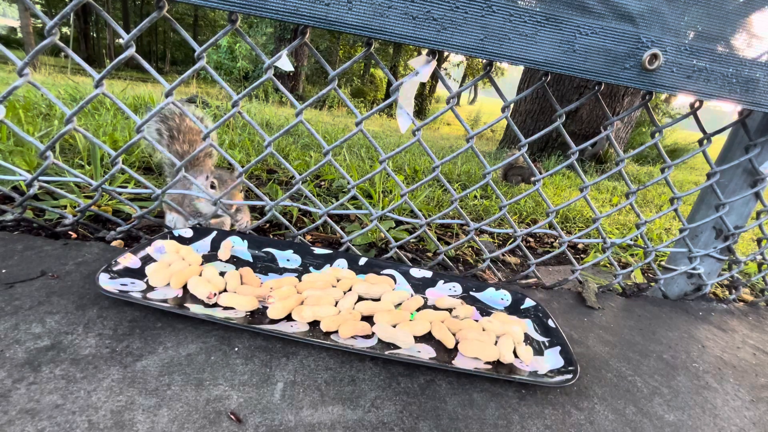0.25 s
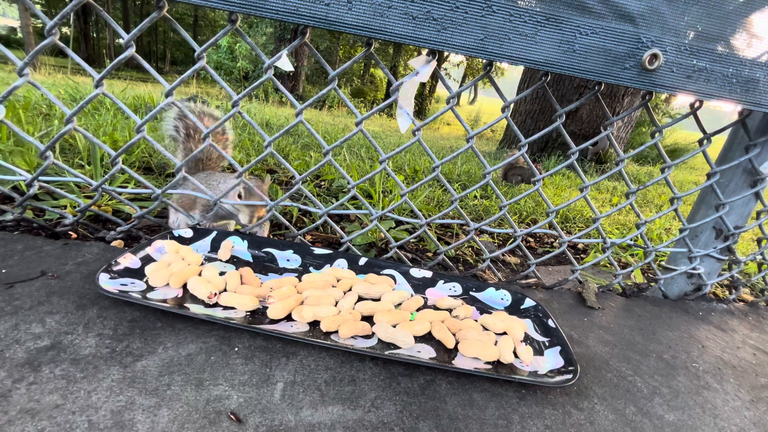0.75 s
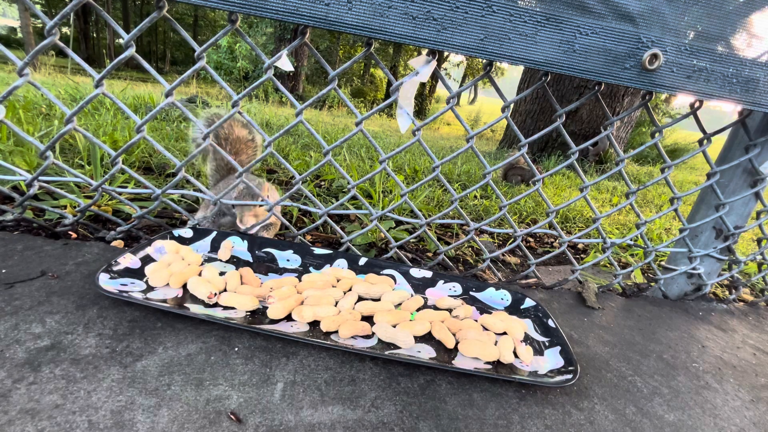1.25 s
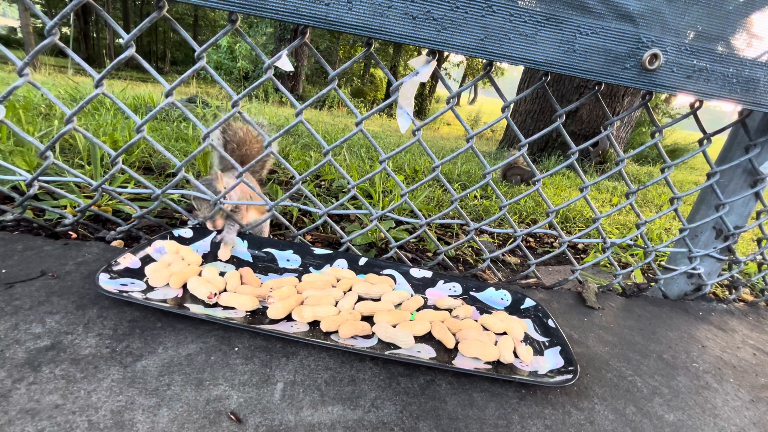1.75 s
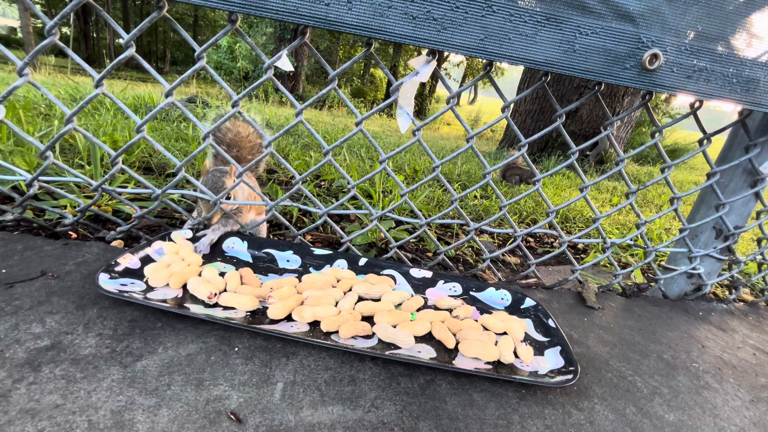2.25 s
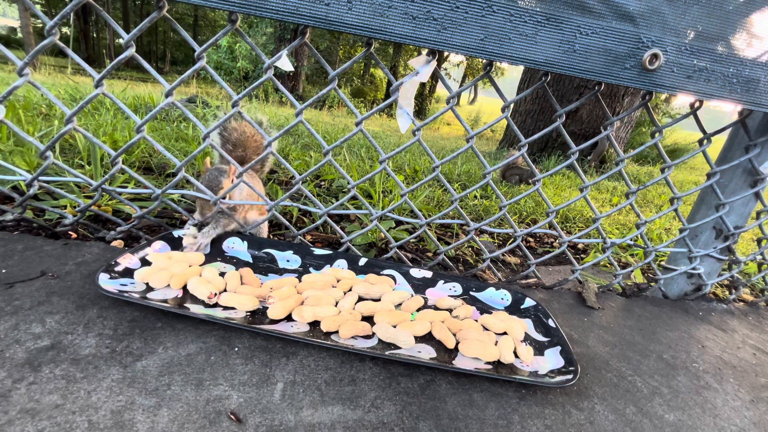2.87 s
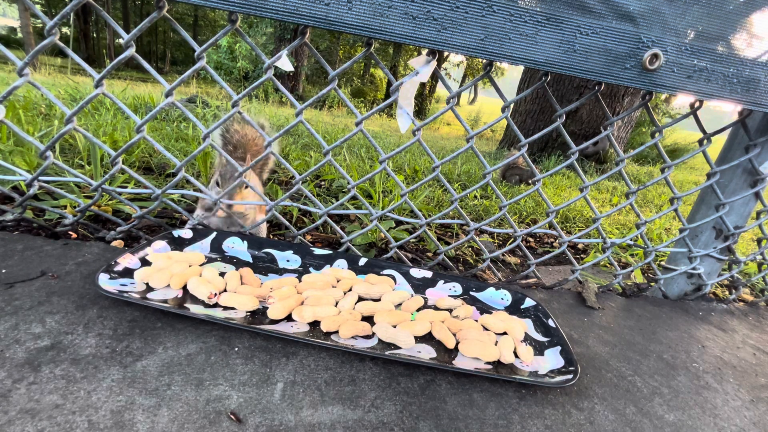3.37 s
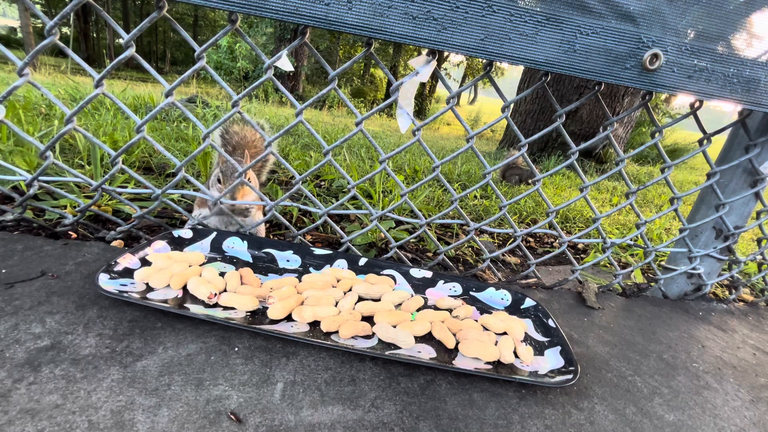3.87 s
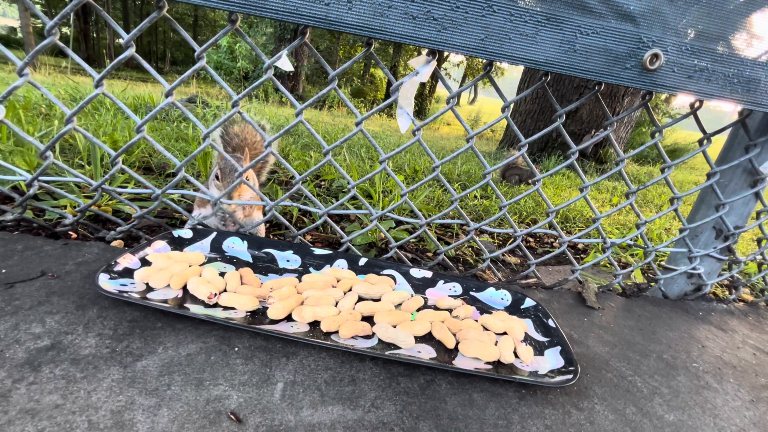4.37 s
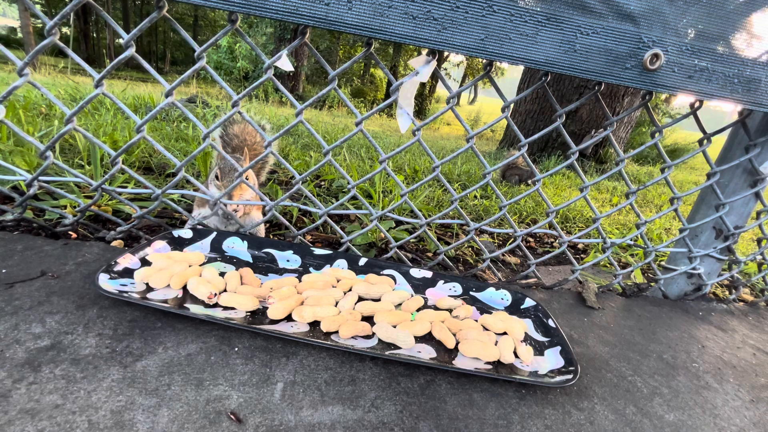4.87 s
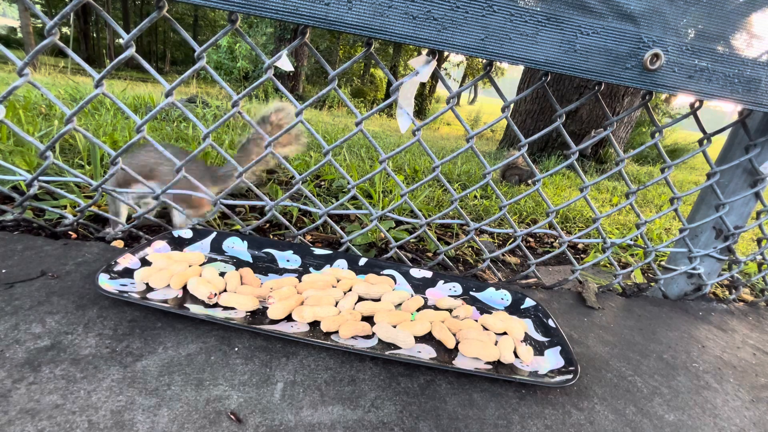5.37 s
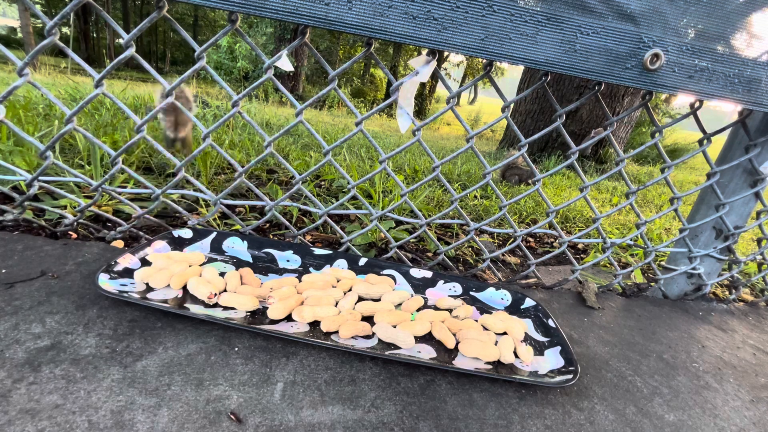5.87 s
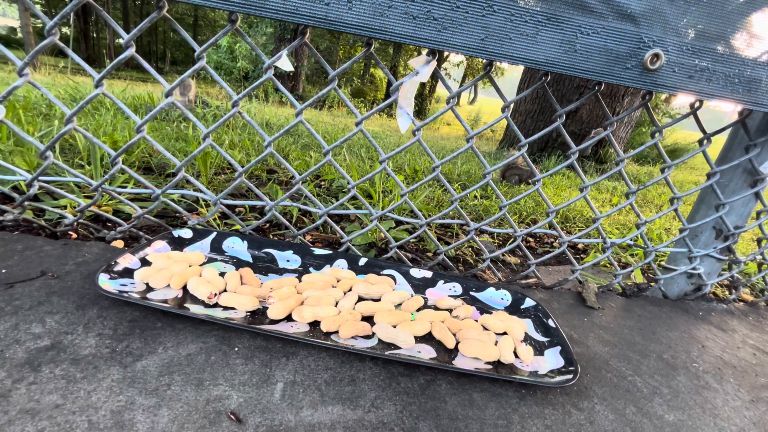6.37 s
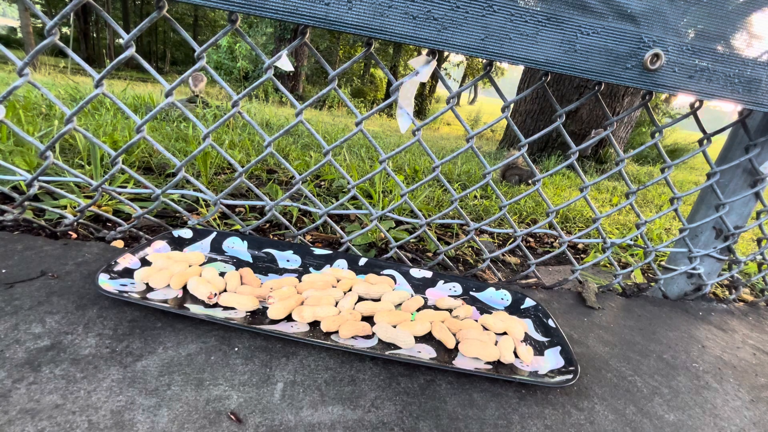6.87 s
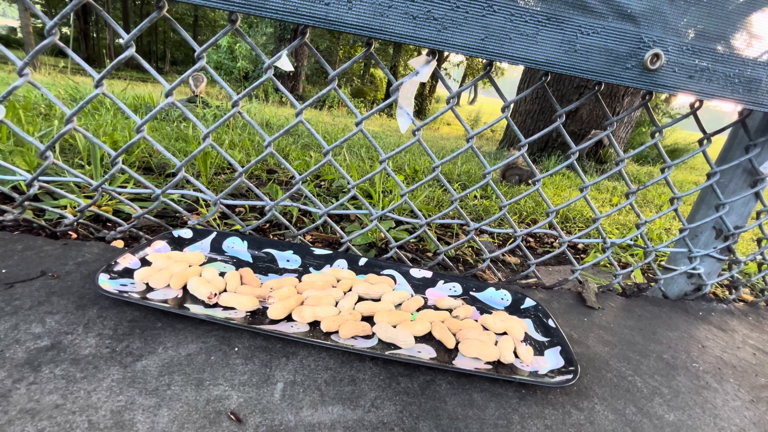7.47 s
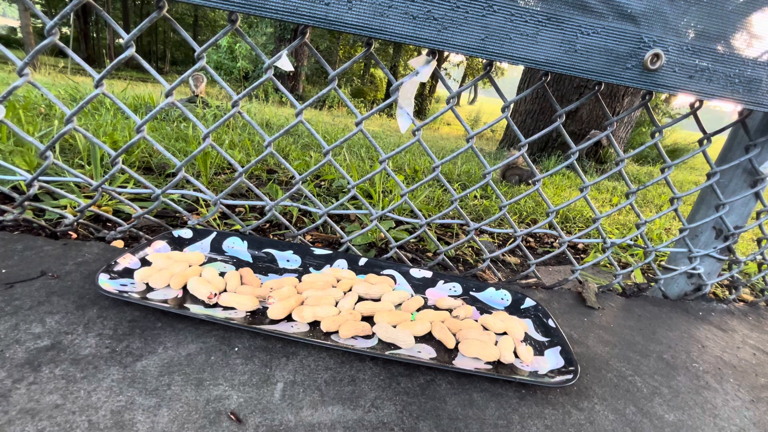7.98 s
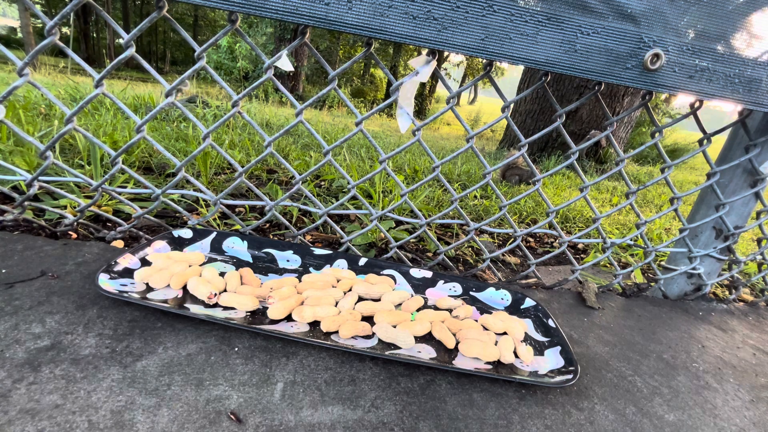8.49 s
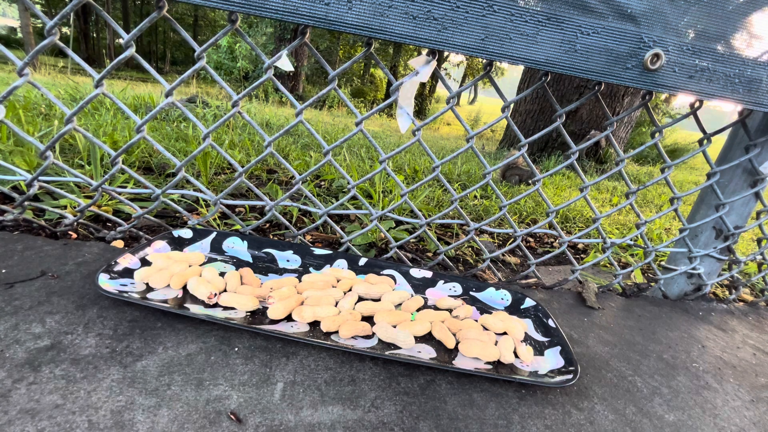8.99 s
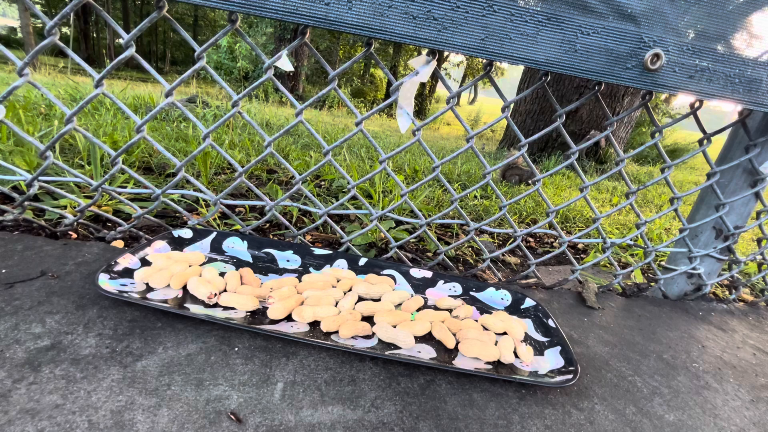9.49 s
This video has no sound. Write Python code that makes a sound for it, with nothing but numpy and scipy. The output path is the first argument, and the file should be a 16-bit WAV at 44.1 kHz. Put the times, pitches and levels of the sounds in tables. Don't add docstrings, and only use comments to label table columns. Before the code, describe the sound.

Outdoor park: sharp clucking chipmunk knocks with quick slapback echoes, close shell cracking and claw ticks early on, faint birds, steady distant traffic.

```python
import sys
import numpy as np
from scipy import signal
from scipy.fft import rfft, irfft, next_fast_len
from scipy.io import wavfile
from scipy.ndimage import uniform_filter1d, map_coordinates

SR = 44100
rng = np.random.default_rng(int(sys.argv[2]) if len(sys.argv) > 2 else 0)


def dump_mix(stems):
    frames = np.atleast_2d(stems).T
    limited = np.clip(frames, -1, 1)
    pcm = np.round(limited * 32767).astype(np.int16)
    wavfile.write(sys.argv[1], SR, pcm)


def decibels_to_gain(level_db):
    exponent = np.asarray(level_db, float) / 20
    return 10 ** exponent


N = 429534
T = np.arange(SR // 10) / SR
PORTS = np.array([[1], [-1]])
PORT_TURN_RAD = 1.45


def unit(x):
    return x / np.sqrt(np.mean(x ** 2) + 1e-20)


def along(points, hz):
    f, v = np.transpose(points)
    return np.interp(np.log(hz + 1), np.log(f + 1), v)


def curves(rows):
    s, *cols = np.transpose(rows)
    return [np.interp(np.arange(N) / SR, s, c) for c in cols]


def wobble(rate_hz):
    knots = rng.standard_normal(int(N * rate_hz / SR) + 4)
    return map_coordinates(knots, [np.arange(N) * rate_hz / SR])


def filtered(x, response):
    n = x.shape[-1]
    m = next_fast_len(n + 4096)
    return irfft(rfft(x, m) * response(np.fft.rfftfreq(m, 1 / SR)), m)[..., :n]


def resonant(modes):
    def response(f):
        total = 0
        for k, (hz, width_hz, db) in enumerate(modes):
            damping = 1j * f * width_hz
            total = total + (-1) ** k * decibels_to_gain(db) * damping / (hz * hz - f * f + damping)
        return total
    return response


def ring(hz, t60_s, attack_s):
    return np.sin(2 * np.pi * hz * T) * decibels_to_gain(-60 * T / t60_s) * (1 - np.exp(-T / attack_s))


def add(out, s, sound, pan_db, lag_s=0.):
    out[0, round(s * SR) + round(lag_s * SR):][:len(sound)] += decibels_to_gain(pan_db / 2) * sound
    out[1, round(s * SR):][:len(sound)] += decibels_to_gain(-pan_db / 2) * sound


# pitch_hz, t60_s
PARK_DECAY = [(250, 0.31), (1000, 0.75), (4000, 0.66), (12000, 0.65)]


def park(x, wet_db):
    hz, t, z = signal.stft(rng.standard_normal((2, SR // 2)), SR, nperseg=256)
    decay = decibels_to_gain(-60 * t / along(PARK_DECAY, hz)[:, None])
    tail = signal.istft(z * decay, SR, nperseg=256)[1]
    late = np.pad(x, ((0, 0), (90, 0)))
    return decibels_to_gain(wet_db) * signal.fftconvolve(late, tail / 50, axes=1)


# pitch_hz, pan_db
CLICK_PAN = [(1400, 11), (2200, 11), (3800, 5.5), (5200, 17), (7500, 8.5), (9500, -2), (13000, -4.5)]
TWIN_S = .00033
CLICK_TOP_HZ, CLICK_EDGE_HZ = 11500, 12000


def knock_click(db, snap_hz, snap, twin, edge, rise_s, t60_s):
    scratch = decibels_to_gain(-60 * T / t60_s) * (1 - np.exp(-T / rise_s)) * rng.standard_normal(len(T))
    scratch[0] = edge
    twin_s = TWIN_S * decibels_to_gain(rng.normal(0, 1))
    mouth = resonant([*snap[:1], *[(hz, .3 * hz, 4) for hz in snap_hz], *snap[1:]])

    def response(f):
        doubled = 1 + twin * np.exp(-2j * np.pi * f * twin_s)
        return mouth(f) * doubled / (1 + 1j * f / CLICK_TOP_HZ) ** 2 / (1 + (f / CLICK_EDGE_HZ) ** 6)

    burst = filtered(scratch, response)
    click = np.zeros((2, SR // 4))
    add(click, .001, decibels_to_gain(db) * burst / np.abs(burst).max(), 0)
    return click


# pitch_hz, level_db, t60_s
PARTIALS = [(678, -20, 0.059), (1171, -13, 0.073), (1418, -12.5, 0.022), (1526, -13.5, 0.033),
            (2327, -23, 0.046)]
# pitch_hz, pan_db
BODY_PAN = [(300, 2), (700, -7.5), (1000, -3.5), (1500, 0.5)]
RING_ATTACK_S, RING_T60_S, RING_SCATTER_DB = .0003, .028, 2.5
LEAD_RATIO, LEAD_T60_S = 1.244, 0.0082
THUMP_S = .006


def knock_body(hz, ring_db, thump_db, lead_db, partials_db, rough, bounce_s, swell_s, bounce_db, pan_db):
    body = np.zeros((2, SR // 4))
    lag_s = 7 / SR
    rasp = 1 + rough * unit(uniform_filter1d(rng.standard_normal(len(T)), size=70))
    hollow = ring(hz * 1.087, RING_T60_S, RING_ATTACK_S)
    hollow = hollow + decibels_to_gain(lead_db) * ring(hz * LEAD_RATIO, LEAD_T60_S, RING_ATTACK_S)
    for partial_hz, level_db, t60_s in PARTIALS:
        gain = decibels_to_gain(partials_db + level_db + rng.normal(0, RING_SCATTER_DB))
        hollow = hollow + gain * ring(partial_hz, t60_s, RING_ATTACK_S)
    add(body, .0012, decibels_to_gain(ring_db) * rasp * hollow, pan_db, lag_s)
    swell = (T / swell_s * np.exp(1 - T / swell_s)) ** 1.34
    bounce = rasp * swell * np.sin(2 * np.pi * hz * T)
    add(body, bounce_s, decibels_to_gain(ring_db + bounce_db) * bounce, pan_db, lag_s)
    add(body, THUMP_S, decibels_to_gain(thump_db) * ring(245, 0.018, 0.0016), 1.5, lag_s)
    return filtered(body, lambda f: decibels_to_gain(along(BODY_PAN, f) / 2 * PORTS))


PARK_TOP_HZ = 4000
RUFFLE_DB = 2.5


def knocks(rows, echoes, snap, twin, edge, click_rise_s, lead_db, partials_db, click_t60_s, click_db, rough,
          bounce_s, swell_s, bounce_db, ring_db, ring_pan_db, thump_db, wet_db, bright_db):
    out = np.zeros((2, N + 2 * SR))
    for (s, db, hollow_db, hz, *snap_hz), walls in zip(rows, echoes):
        click = knock_click(db + click_db, snap_hz, snap, twin, edge, click_rise_s, click_t60_s)
        dull = filtered(click, lambda f: 1 / (1 + 1j * f / PARK_TOP_HZ) ** 2)
        turn = np.exp(-.5j * PORT_TURN_RAD * PORTS)
        click = filtered(click, lambda f: decibels_to_gain(along(CLICK_PAN, f) / 2 * PORTS) * turn)
        body = knock_body(hz, hollow_db + ring_db, hollow_db + thump_db, lead_db, partials_db, rough,
                         bounce_s, swell_s, bounce_db, ring_pan_db)
        start = round((s - .001) * SR)
        wet = park(decibels_to_gain(bright_db) * dull + body, wet_db)
        wet = wet * decibels_to_gain(RUFFLE_DB * unit(uniform_filter1d(rng.standard_normal(wet.shape), size=300)))
        out[:, start:start + wet.shape[1]] += wet
        out[:, start:start + SR // 4] += click + body
        far_click = filtered(click, lambda f: 1 / (1 + 1j * f / 7000) ** 2)
        for delay_s, snap_db, echo_db in walls:
            echo = decibels_to_gain(snap_db) * far_click + decibels_to_gain(echo_db + rng.normal(0, 0.72)) * body
            out[:, start + round(delay_s * SR):][:, :SR // 4] += echo
    return out[:, :N]


# start_s, click_db, ring_db, ring_hz, click_body_hz
CLUCKS = [(0.9225, -24.5, -26.5, 892, 2220), (2.6276, -20, -24, 907, 2580), (4.3976, -21.5, -26, 890, 2280),
          (6.259, -21.5, -24, 888, 2260), (8.083, -22.5, -25.5, 886, 3100)]
# start_s, click_db, ring_db, ring_hz
SLAPS = [(.9445, -17.5, -22.5, 993), (.957, -21.5, -30, 906), (2.6474, -15, -20, 928),
         (2.6621, -19, -23.5, 916), (4.4183, -17.5, -23.5, 970), (4.4318, -20.5, -31.5, 950),
         (6.2808, -17, -19.5, 983), (6.2933, -20.5, -28, 888), (8.0997, -16, -24, 1018),
         (8.1185, -28, -31, 940)]
# start_s, click_db, ring_db, ring_hz
CHUCKS = [
    (1.634, -26.5, -22, 1013),
    (3.2332, -28.5, -25, 1006),
    (4.9836, -26.5, -26, 1030),
    (6.9077, -28, -25.5, 1026),
    (8.4625, -33, -31.5, 1020),
    (8.4806, -42, -36, 1067),
]
# start_s, click_db, ring_db, ring_hz, click_body_hz
SCUFFS = [(0.2186, -32, -38, 968, 4900), (1.9757, -31, -30.5, 954, 4150), (3.6646, -32.5, -34.5, 900, 6250),
          (5.5837, -31.5, -31, 1065, 1680), (7.3037, -38.5, -45, 975, 2470),
          (9.2437, -34.5, -34, 960, 3700)]
# pitch_hz, width_hz, level_db
CLUCK_SNAP = [(1450, 660, -8), (5500, 840, -2), (8640, 3000, -5)]
SLAP_SNAP = [(1460, 260, -9), (3000, 3300, -11), (5560, 4700, 3), (10600, 1500, 0.5)]
CHUCK_SNAP = [(1490, 160, 6.5), (2160, 710, 1.5), (3300, 4500, 1), (4750, 1670, 2.5), (7300, 1600, -5),
              (10100, 4700, -9.5)]
SCUFF_SNAP = [(1250, 270, 7.5), (4900, 990, -9), (5970, 6100, -1), (10200, 2500, -16)]
# delay_s, click_db, ring_db
SLAP_WALL = [(.040, -20, -14.5)]
# delay_s, delay_s, delay_s
NEAR_WALLS_S = [(.040, 0.042, .0745), (0.035, 0.051, .072), (0.0383, 0.0483, .0745), (0.0397, .050, .074),
                (.0435, .050, .079), (.0435, 0.047, .065)]
# click_db, ring_db
NEAR_WALLS_DB = [(-12, -17.5), (-10, -20), (-19, -16.5)]
# delay_s, click_db, ring_db
FLUTTER = [(.116, -36, -29), (.156, -23, -27.5), (.198, -28, -32)]
# delay_s, click_db, ring_db
FAR_WALL = [(0.04, -20, -6), (0.072, -25, -9), (0.047, -18, -13), (.044, -17, -9.5), (.043, -22, -4),
            (0.055, -16, -10)]
# delay_s, click_db, ring_db
SCUFF_AFTER = [
    (.0065, -7.5, -15.5),
    (0.081, -24, -28),
]


def knocking():
    clucks = knocks(
        CLUCKS, [[]] * len(CLUCKS), CLUCK_SNAP, twin=0.4, edge=12, click_rise_s=.0003, lead_db=-10.0,
        partials_db=8.5, click_t60_s=0.014, click_db=2.5, rough=0.16, bounce_s=0.00566, swell_s=0.0044,
        bounce_db=5, ring_db=-9.0, ring_pan_db=2.0, thump_db=13.5, wet_db=-4, bright_db=-1.5)
    slaps = knocks(
        SLAPS, [SLAP_WALL] * len(SLAPS), SLAP_SNAP, twin=0.23, edge=14, click_rise_s=.0003, lead_db=1.5,
        partials_db=0.0, click_t60_s=0.013, click_db=-4.5, rough=0.12, bounce_s=0.0052, swell_s=0.0026,
        bounce_db=7.0, ring_db=-3.0, ring_pan_db=3.0, thump_db=7.5, wet_db=-10, bright_db=13)
    chuck_walls = []
    for delays_s in NEAR_WALLS_S:
        near = [(delay_s, *levels) for delay_s, levels in zip(delays_s, NEAR_WALLS_DB)]
        chuck_walls.append([*near, *FLUTTER])
    chucks = knocks(
        CHUCKS, chuck_walls, CHUCK_SNAP, twin=0.66, edge=23, click_rise_s=0.00021, lead_db=-25,
        partials_db=0.5, click_t60_s=0.022, click_db=3.5, rough=0.26, bounce_s=0.003975, swell_s=0.0035,
        bounce_db=-0.5, ring_db=6.5, ring_pan_db=1.4, thump_db=12.0, wet_db=-17.5, bright_db=17.5)
    scuff_walls = [[wall, *SCUFF_AFTER] for wall in FAR_WALL]
    scuffs = knocks(
        SCUFFS, scuff_walls, SCUFF_SNAP, twin=0.16, edge=0.93, click_rise_s=0.0019, lead_db=-6.5,
        partials_db=-8.0, click_t60_s=0.017, click_db=1.0, rough=0.88, bounce_s=0.0055, swell_s=0.0041,
        bounce_db=-11.5, ring_db=3.5, ring_pan_db=4.5, thump_db=14.0, wet_db=-6.5, bright_db=3.0)
    return clucks + slaps + chucks + scuffs


CRACK_PAN_DB, SPLINTER_T60_S = 4.5, .028


def crack(out, s, db, treble_db, hz, t60_s, rise_s):
    grit = decibels_to_gain(0.62 * rng.standard_normal(len(T))) * rng.standard_normal(len(T))
    decay = decibels_to_gain(-60 * (T / np.clip(t60_s, .008, .1)) ** 0.95) + decibels_to_gain(-36 - 60 * T / 0.14)
    burst = grit * decay * (1 - np.exp(-T / rise_s))
    shell = resonant([(hz, 0.33 * hz, 6.5), (4300, 2000, -1.5), (6500, 3000, -1.5)])
    shards = resonant([(9500, 3000, -1.2), (12800, 3500, 0.8)])
    body = filtered(burst, lambda f: shell(f) * (1j * f / (1500 + 1j * f)) ** 2 / (1 + (f / 9500) ** 4))
    splinter = filtered(burst * decibels_to_gain(-60 * T / SPLINTER_T60_S),
                        lambda f: shards(f) / (1 + (5600 / (f + 1)) ** 6))
    add(out, s - .001, decibels_to_gain(db + 6.0) * body / np.abs(body).max(), CRACK_PAN_DB, lag_s=2 / SR)
    ports = filtered(splinter, lambda f: np.exp(-.5j * PORT_TURN_RAD * PORTS) + 0 * f)
    start = round((s - .001) * SR)
    out[:, start:][:, :len(T)] += decibels_to_gain(treble_db + 12.0) * ports / np.abs(splinter).max()


# start_s, hold_s, level_db
BRUSHES = [(0, 0.066, -65), (0.137, 0.053, -63.5), (0.387, 0.16, -68.5), (0.708, 0.13, -73.5),
           (0.996, 0.085, -68), (1.136, 0.013, -71), (1.232, 0.029, -59.5), (1.284, 0.024, -68),
           (1.9, 0.27, -75), (2.125, 0.077, -60), (2.68, 0.12, -76), (2.884, 0.052, -62),
           (2.973, 0.018, -57), (3.07, 0.028, -73), (3.287, 0.092, -73), (3.707, 0.28, -74),
           (4.066, 0.3, -83), (4.794, 0.046, -62), (5.04, 0.074, -72), (4.6, .08, -74), (5.396, 0.17, -80),
           (5.77, 0.14, -76), (6.15, 0.029, -72), (6.346, 0.14, -74), (7.024, 0.18, -80),
           (7.656, 0.08, -97), (8.29, 0.033, -64.5), (9.297, 0.18, -85)]
BRUSH_ATTACK_S, BRUSH_RELEASE_S, STILL_DB = 0.0093, 0.026, -95


def brushing():
    t = np.arange(0, N / SR, .002)
    gain = decibels_to_gain(STILL_DB)
    for s, hold_s, db in BRUSHES:
        before_s = np.clip(s - t, 0, None)
        after_s = np.clip(t - s - hold_s, 0, None)
        gain = gain + decibels_to_gain(db) * np.exp(-before_s / BRUSH_ATTACK_S - after_s / BRUSH_RELEASE_S)
    return np.interp(np.arange(N) / SR, t, gain)


# pitch_hz, level_db_per_hz
LEAVES = [(1470, -55), (2500, -18.5), (3830, -3.5), (5740, -6), (9000, -6.5), (12800, -3.5), (14500, -7.5),
          (15600, -25)]
# pitch_hz, ratio
APART = [(9000, 2), (11500, .35), (13000, .35), (14500, 2)]
GUSTY_DB, GRITTY_DB, GRAINY_DB = 3, 2, 4


def rustle():
    swing_db = GUSTY_DB * wobble(25) + GRITTY_DB * wobble(150) + GRAINY_DB * wobble(720)
    grains = decibels_to_gain(swing_db) * rng.standard_normal((3, N))
    share = lambda hz: np.array([hz ** 0, *[along(APART, hz)] * 2])
    shared, *private = filtered(grains, lambda hz: decibels_to_gain(along(LEAVES, hz)) * share(hz))
    return brushing() * unit(shared + np.array(private))


# start_s, peak_db, treble_peak_db, ring_hz
CRACKS = [(0.014, -49.5, -58, 1940), (0.057, -50.5, -67, 1830), (.15, -60, -55, 1750),
          (0.254, -51.5, -56.5, 1750), (0.294, -62, -66, 2200), (.42, -46, -49, 4160),
          (.5227, -53.5, -59, 2960), (0.7162, -41, -46, 5170), (0.7202, -36, -53, 3770),
          (1.8269, -32, -36.5, 4430), (1.8356, -36, -68, 2770), (1.9567, -50, -68, 3700),
          (2.039, -62, -67, 1790), (2.141, -48, -55, 3900), (2.17, -35, -44, 4360), (2.193, -53, -58, 4650),
          (2.224, -49, -54, 4060), (2.345, -37, -49, 4150), (2.3762, -48, -53, 3070),
          (2.679, -32.5, -36.5, 4470), (2.875, -46, -51, 4360), (2.879, -55, -58, 3900),
          (2.9762, -48, -52, 1700), (3.043, -39, -42, 4050), (3.257, -48, -44, 4470),
          (3.3282, -51, -59, 1790), (4.792, -64, -63, 3000), (0.267, -59, -78, 1500),
          (2.049, -66, -65, 1700), (4.408, -48, -66, 5200), (2.671, -45, -66, 4500),
          (8.4877, -54, -72, 3480), (5.091, -58, -71, 4300), (4.882, -52.5, -46.5, 3540)]
CRACK_T60_S, CRACK_RISE_S = 0.072, 0.00034
# start_s, peak_db, treble_peak_db, ring_hz
SCRAPES = [(.284, -54, -72, 1800), (2.035, -58, -76, 1700), (1.232, -75, -61, 4470),
           (2.1166, -61, -59, 3310), (2.933, -54, -73, 4740), (4.779, -44.5, -51, 5500),
           (4.788, -51, -49.5, 1750), (4.808, -48, -59, 1590), (4.8217, -62, -70, 1700),
           (8.291, -57, -82, 1700)]
SCRAPE_T60_S, SCRAPE_RISE_S = 0.12, 0.0092
# start_s, peak_db
TICKS = [(0.04, -53), (0.0852, -48), (.0905, -48), (.1005, -46), (0.106, -42), (.1415, -58), (0.389, -51),
         (.3955, -53), (.513, -59), (1.287, -44), (1.304, -48), (0.646, -49.5), (0.669, -49), (1.0708, -51),
         (1.1343, -55), (1.185, -53), (2.1156, -56), (2.5633, -59), (3.493, -55.5), (3.9814, -67),
         (4.173, -56), (4.1854, -51), (4.309, -49), (4.728, -57), (4.7515, -57), (4.761, -40), (3.622, -64),
         (.901, -67), (5.2598, -64), (5.2974, -55), (5.6271, -61), (5.767, -57), (5.8533, -51),
         (7.7255, -56), (7.842, -59), (7.865, -59.5), (8.682, -49), (9.439, -62),
         (.0675, -53), (.1915, -54), (.203, -54), (.5365, -54), (.6407, -63), (.697, -61),
               (.8255, -59), (.8345, -58), (1.265, -45), (1.9473, -56), (2.034, -55), (2.349, -37),
               (3.0864, -52), (3.373, -59), (3.783, -63), (4.096, -59), (4.2288, -60), (4.512, -60),
               (4.6236, -61), (4.6374, -59), (5.11, -57), (5.3703, -62), (5.4974, -60), (5.732, -63),
               (5.7814, -54), (6.2148, -63), (7.0374, -59)]
TICK_T60_S, TICK_HZ, TICK_BODY_DB, TICK_TREBLE_DB = 0.012, 1900, -13.5, -10
# start_s, level_db, ring_hz
PINGS = [(.255, -48, 1000), (.2862, -44, 1950), (.297, -50, 1500), (.7216, -34.5, 1930),
         (1.835, -25.5, 2010), (2.04, -40, 1760), (2.05, -54, 1900)]
PING_T60_S, PING_RISE_S = .035, .0015


def squirrel():
    out = np.zeros((2, N + SR))
    for row in CRACKS:
        crack(out, *row, CRACK_T60_S, CRACK_RISE_S)
    for row in SCRAPES:
        crack(out, *row, SCRAPE_T60_S, SCRAPE_RISE_S)
    for s, db in TICKS:
        crack(out, s, db + TICK_BODY_DB, db + TICK_TREBLE_DB, TICK_HZ, TICK_T60_S, CRACK_RISE_S)
    for s, db, hz in PINGS:
        add(out, s - .001, decibels_to_gain(db) * ring(hz, PING_T60_S, PING_RISE_S), CRACK_PAN_DB)
    return out[:, :N] + park(out, wet_db=-17.0)[:, :N] + rustle()


# start_s, first_hz, level_db, notes
BIRDS = [(.49, 3770, -68, 1), (.515, 3550, -75, 3), (.815, 4670, -75, 1), (1.05, 3300, -72, 1),
         (1.28, 4660, -74, 1), (1.304, 4700, -72.5, 2), (1.48, 3730, -74, 2), (1.894, 3640, -65, 2),
         (2.37, 3700, -57, 1), (2.483, 3520, -70, 3), (3.17, 3350, -65, 1), (3.18, 4200, -69, 1),
         (3.75, 3590, -69.5, 2), (4.03, 3930, -74, 1), (5.12, 3300, -68, 1), (5.89, 3770, -72, 1),
         (5.42, 4470, -69.5, 1), (6.045, 4360, -71, 1), (6.07, 3640, -69.5, 3), (6.68, 3760, -77, 2),
         (7.432, 4740, -70, 2), (7.462, 3510, -65, 2), (7.689, 4400, -73, 1), (7.837, 3300, -70.5, 1),
         (8.999, 4200, -77, 1), (9.33, 4600, -72, 1), (9.72, 3200, -74, 1), (3.91, 4520, -73, 1),
         (3.725, 5170, -69, 1)]
NOTE_S, NOTE_GAP_S, NOTE_FALL, NEXT_NOTE, NEXT_DB = .027, .018, .91, .88, -.5
# start_s, pitch_hz, length_s, level_db
HELD = [(5.31, 3020, .24, -79), (6.03, 4740, .17, -81), (7.08, 3200, .1, -80), (2.37, 2900, .08, -74),
        (.77, 4000, .05, -75), (7.5, 3350, .15, -79), (7.5, 4330, .15, -85), (2.293, 4700, .022, -68),
        (2.312, 4000, .025, -71), (2.325, 3600, .025, -68), (.54, 3500, .07, -76), (5.24, 4950, .035, -72),
        (5.263, 4150, .035, -69), (5.28, 3480, .035, -70), (.795, 3080, .03, -74), (.855, 2900, .05, -70),
        (.665, 4850, .03, -74)]
CHORUS_DB, BIRD_WET_DB, BIRD_SPREAD_DB = -87, -1.5, 3
STEADY, BLURRED, BLUR_RATE_HZ = .5, .8, 450


def birds():
    out = np.zeros((2, N + SR))
    notes = []  # start_s, start_hz, end_hz, length_s, level_db
    for s, first_hz, db, count in BIRDS:
        for k in range(round(count)):
            hz = first_hz * NEXT_NOTE ** k
            notes.append((s + k * NOTE_GAP_S, hz, hz * NOTE_FALL, NOTE_S, db + k * NEXT_DB))
    for when, pitch, fall, size in rng.random((220, 4)):
        start_hz, end_hz = 2900 + 1900 * pitch, 2800 + 1900 * pitch - 500 * fall
        notes.append((when * N / SR, start_hz, end_hz, 0.018 + 0.05 * size, CHORUS_DB + 6 * fall))
    for s, hz, length_s, db in HELD:
        notes.append((s, hz, .97 * hz, length_s, db))
    blur = wobble(BLUR_RATE_HZ)
    for s, start_hz, end_hz, length_s, db in notes:
        u = np.linspace(0, 1, round(length_s * SR))
        glide_hz = start_hz + (end_hz - start_hz) * u
        note = np.sin(np.pi * u) * np.sin(2 * np.pi * np.cumsum(glide_hz) / SR)
        note *= unit(STEADY + BLURRED * blur[rng.integers(N - SR):][:len(u)])
        add(out, s, decibels_to_gain(db + 11.0) * note, rng.normal(0, BIRD_SPREAD_DB), lag_s=rng.normal(0, .0001))
    return out[:, :N] + park(out, wet_db=BIRD_WET_DB)[:, :N]


# pitch_hz, correlation
ALIKE = [(60, 0.98), (130, 0.9), (290, 0.38), (640, -0.69), (1410, -0.25), (3100, 0.22), (6820, -0.24),
         (9800, 0.035), (12000, 0.58), (15000, 0.2)]


def rush(spectrum, patchy_db):
    z = signal.stft(rng.standard_normal((2, N)), nperseg=512)[2]
    field = rng.standard_normal(z.shape[1:])
    field = uniform_filter1d(uniform_filter1d(field, 5, 0), 10, 1)
    pair = signal.istft(z * decibels_to_gain(patchy_db * unit(field)), nperseg=512)[1][:, :N]

    def response(hz):
        turn = np.arccos(np.clip(along(ALIKE, hz), -1, 1)) / 2
        return decibels_to_gain(along(spectrum, hz)) * [np.cos(turn), np.sin(turn)]

    mid, side = filtered(pair, response)
    return unit(np.array([mid + side, mid - side]))


# start_s, traffic_db, chatter_db
AIR = [(0.0, -36, -66), (0.49, -37.5, -72), (0.97, -37, -63), (1.41, -36.5, -72.5), (2.06, -37, -62),
       (3.17, -36, -64), (3.42, -37, -69), (4.45, -36.5, -73.5), (4.58, -38, -66.5), (5.42, -35.5, -64),
       (5.78, -37, -71), (6.37, -35.5, -67.5), (6.78, -36, -72), (7.08, -37.5, -66.5), (8.08, -35.5, -68),
       (9.74, -36, -70)]
# pitch_hz, level_db_per_hz
RUMBLE = [(20, -39.5), (31, -35), (45, -4), (76, 1), (245, -14.5), (400, -30), (520, -25), (880, -120)]
TYRES = [(180, -31), (300, -2), (435, -4.5), (493, -9), (613, -5.5), (1610, -22), (2600, -33.5),
         (3380, -72), (5720, -120)]
TREES = [(1290, -25), (2200, -7), (2600, -8.5), (3070, -1.5), (3770, -5.5), (4270, -4.5), (4960, -9.5),
         (5720, -8), (7150, -21.5), (14400, -26.5), (15200, -51)]
INSECTS = [(4300, -61), (5000, -10.5), (5700, 0), (6300, -7), (7200, -61)]
RUMBLE_DB, HISS_DB, HISS_FOLLOWS, CHATTER_DB, INSECTS_DB = 2.5, -48.5, 0.43, -1, -75


def air():
    traffic_db, trees_db = curves(AIR)
    rumble_db = traffic_db + RUMBLE_DB + 0.24 * wobble(2.6)
    rumble = decibels_to_gain(rumble_db) * decibels_to_gain([[-.3], [.3]]) * rush(RUMBLE, patchy_db=1.15)
    hiss_db = HISS_DB + HISS_FOLLOWS * (traffic_db - traffic_db.mean())
    hiss = decibels_to_gain(hiss_db) * rush(TYRES, patchy_db=2)
    chatter = decibels_to_gain(trees_db + CHATTER_DB) * rush(TREES, patchy_db=2.2)
    insects = decibels_to_gain(INSECTS_DB) * rush(INSECTS, patchy_db=0.0)
    return rumble + hiss + chatter + insects


def scene():
    return knocking() + squirrel() + birds() + air()


def roll_off(x):
    return signal.sosfilt(signal.butter(12, 16510, fs=SR, output="sos"), x)


def record(dry):
    mix = filtered(dry, lambda f: 1 / (1 + (f / 15500) ** 40))
    return roll_off(mix)


dry = scene()
out = record(dry)
dump_mix(out)
```